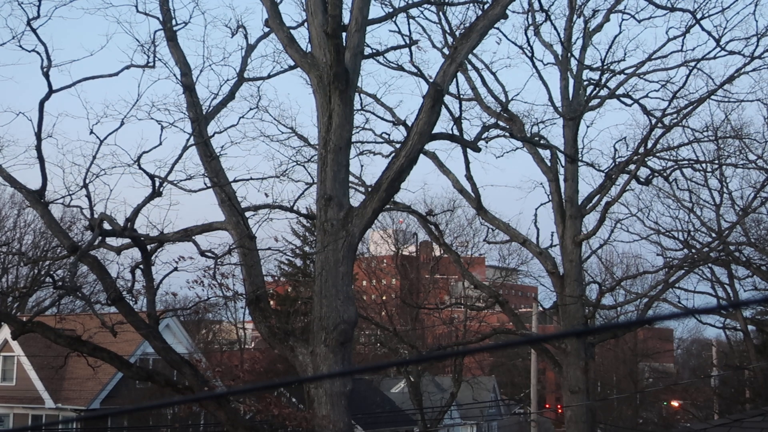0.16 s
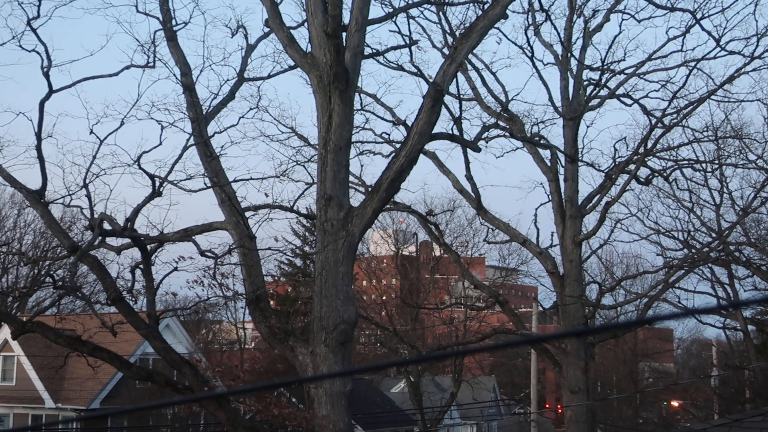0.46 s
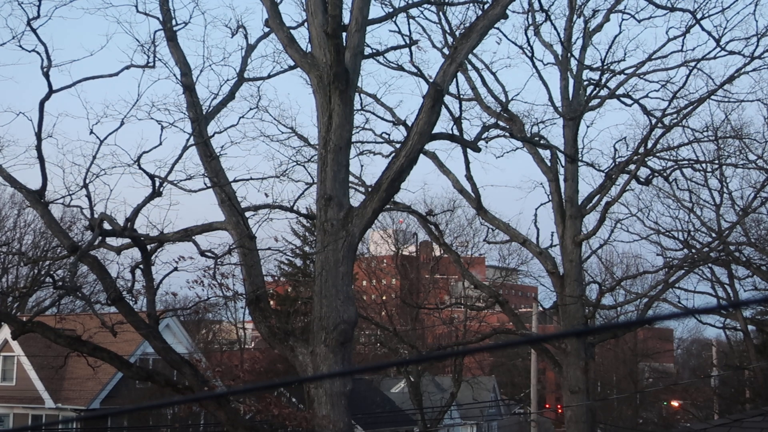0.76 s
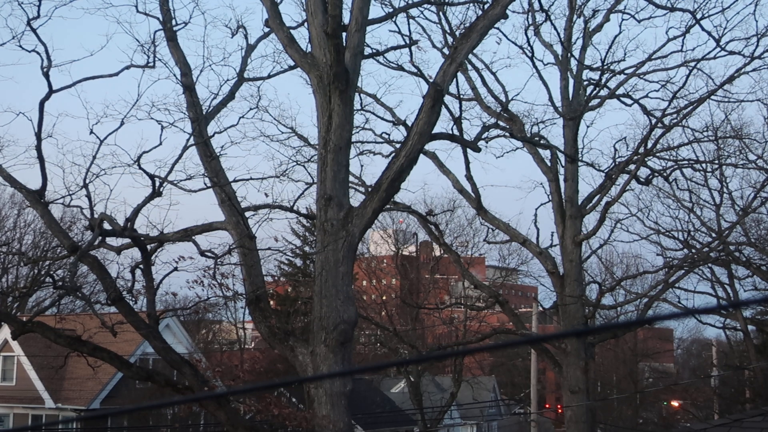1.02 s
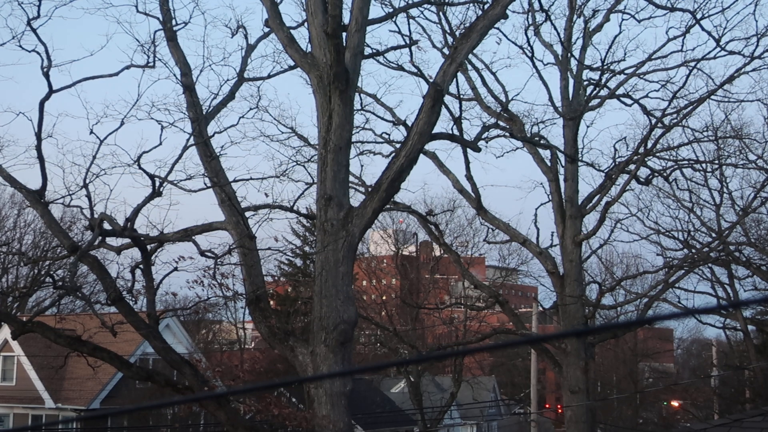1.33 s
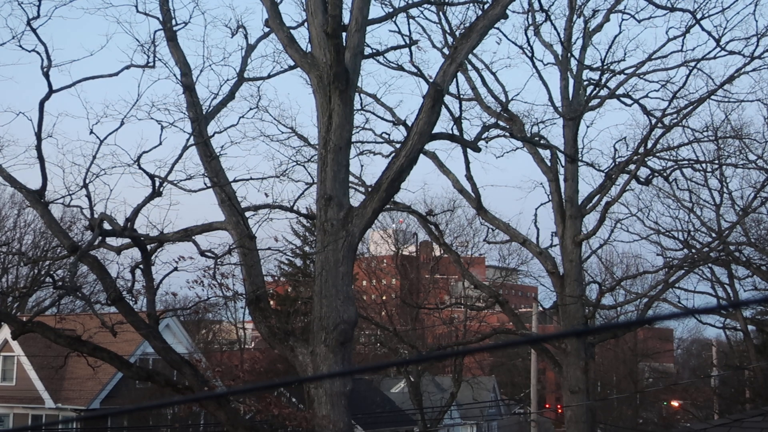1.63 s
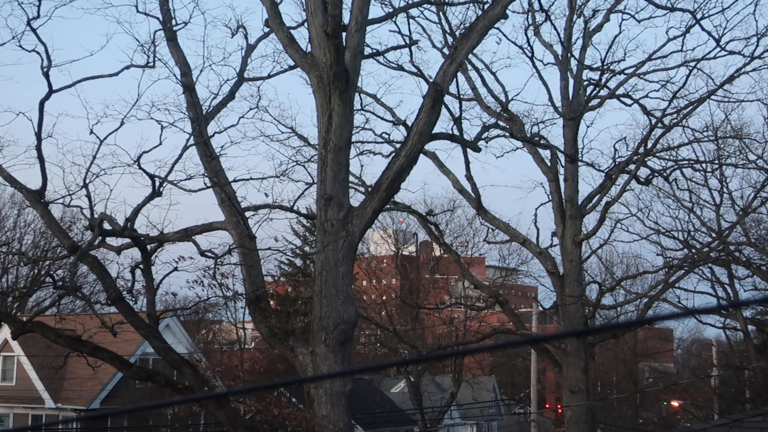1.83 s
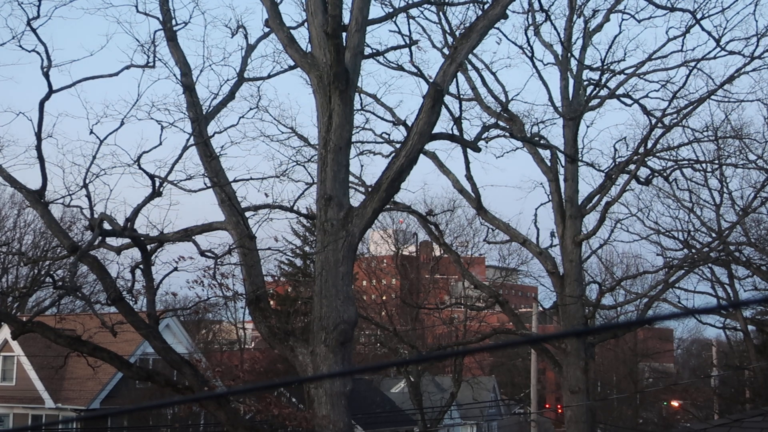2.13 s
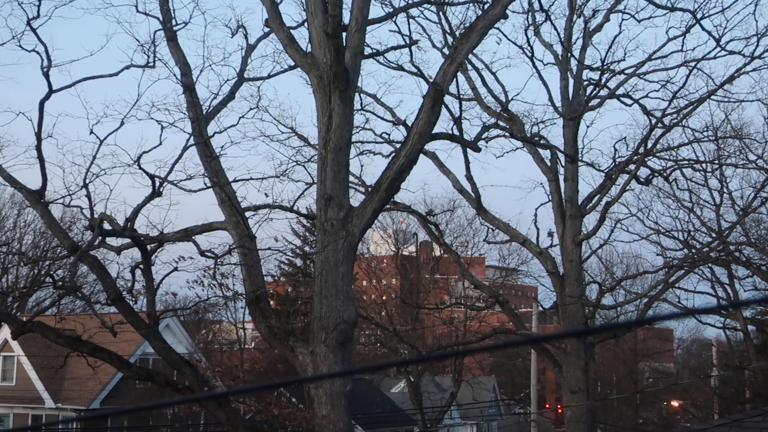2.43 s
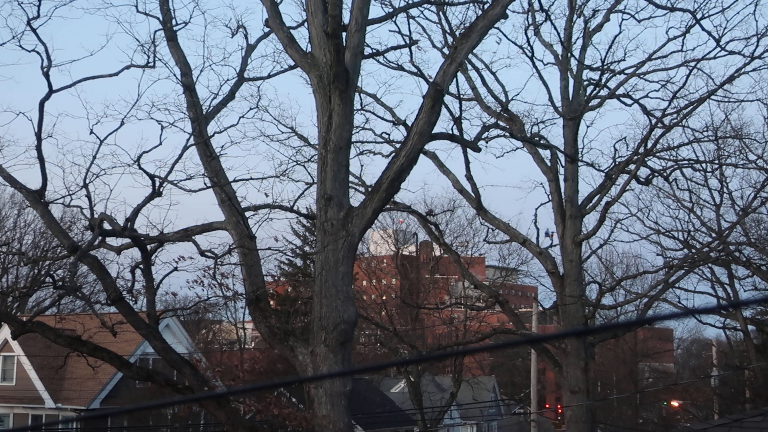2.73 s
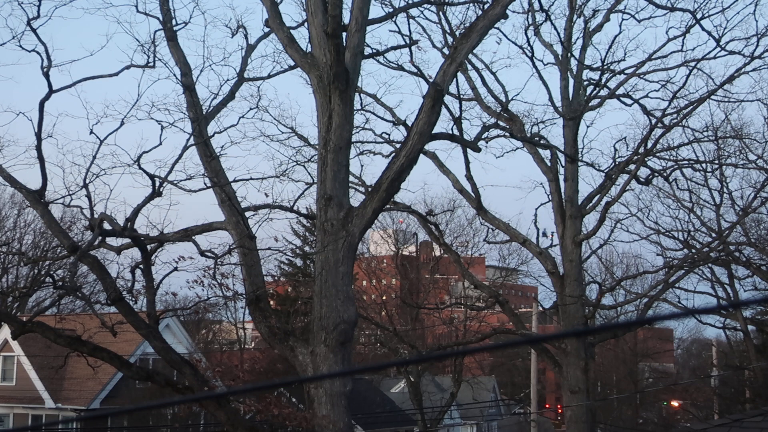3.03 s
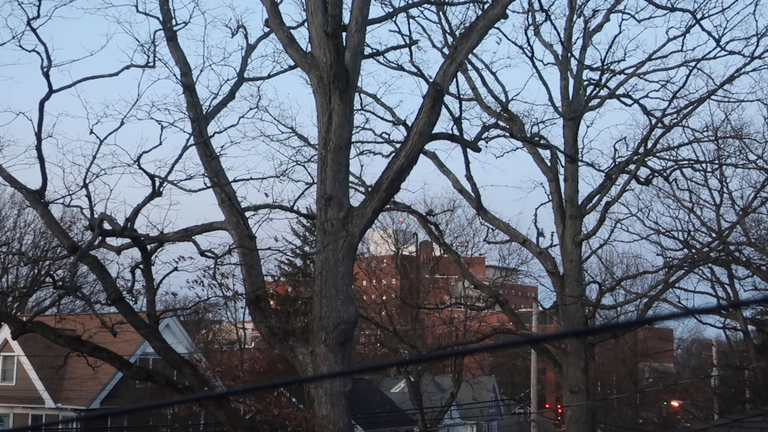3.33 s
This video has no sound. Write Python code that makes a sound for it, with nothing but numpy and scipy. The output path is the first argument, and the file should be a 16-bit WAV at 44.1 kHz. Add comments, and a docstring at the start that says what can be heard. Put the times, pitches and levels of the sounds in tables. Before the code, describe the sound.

Continuous helicopter rotor beat, about twenty-eight thuds a second, starts raspy, turns into sharper uneven slaps, then smears as a low roar rises; heard outdoors from the ground among houses and bare trees.

```python
"""Over houses and bare trees, a four-bladed helicopter flies out of sight.
Each blade pass gives a low thump (harmonics of the blade rate), a hollow slap as it cuts the wake of
the blade ahead (ringing pulse plus scattered noise) and a short rasp (noise burst with ragged bands).
Scattered echoes from the houses return the slaps, over a rush of air (coloured noise) and a faint turbine
whine (wavering sines); near the end the slaps smear and a low roar of noise swells."""
import sys
import numpy as np
from scipy import signal
from scipy.fft import rfft, irfft
from scipy.io import wavfile
from scipy.ndimage import uniform_filter1d, minimum_filter1d

SR = 44100
rng = np.random.default_rng(int(sys.argv[2]) if len(sys.argv) > 2 else 0)


def pcm_store(signal):
    """Save signal as 16-bit PCM."""
    levels = np.round(np.clip(np.atleast_2d(signal), -1, 1) * 32767)
    wavfile.write(sys.argv[1], SR, levels.astype(np.int16).T)


N = 153027

# the four blades in turn: (slap offset [dB], rasp offset [dB])
BLADE_OFFSETS = [(1.5, 1.5), (3.5, 0.6), (1.5, 1.3), (2, 0.76)]


def amp(db):
    """Decibels to gain."""
    return 10 ** (np.asarray(db) / 20)


def evened(x):
    """Scales each row to rms 1."""
    return x / np.sqrt(np.mean(x ** 2, axis=-1, keepdims=True) + 1e-30)


def curve(table, t):
    """Each column of a time table, interpolated at t."""
    s, *columns = np.transpose(table)
    return [np.interp(t, s, c) for c in columns]


def read(points, hz):
    """A spectrum interpolated on a log-frequency axis."""
    f, value = np.transpose(points)
    return np.interp(np.log(hz + 1), np.log(f), value)


def colour(x, points, power=1, size=2048):
    """Filters a sound, without phase shift, by a dB spectrum times power."""
    x = np.pad(x, size, "reflect", reflect_type="odd")
    gain = amp(power * read(points, np.fft.rfftfreq(len(x), 1 / SR)))
    return irfft(rfft(x) * gain, len(x))[size:-size]


def noise(points):
    """Steady noise of rms 1 with the given spectrum."""
    gain = amp(read(points, np.fft.rfftfreq(N, 1 / SR)))
    return evened(irfft(rfft(rng.standard_normal(N)) * gain, N))


def add(mix, s, sound):
    """Mixes a sound in at time s, cropped to the mix."""
    at = round(s * SR)
    sound = sound[max(-at, 0):]
    part = mix[max(at, 0):][:len(sound)]
    part += sound[:len(part)]


def flutter():
    """Quick, irregular gain of churned air: smoothed noise in dB."""
    flutter_rms_db = 2.5
    smooth = uniform_filter1d(uniform_filter1d(rng.standard_normal(N), size=700), size=400)
    return amp(flutter_rms_db * evened(smooth))


def roar(t):
    """Low, fluttering roar of coloured noise that swells near the end."""
    # relative spectrum: (frequency [Hz], density [dB per Hz])
    roar_colour = [(40, -21.5), (90, 3.5), (150, -6), (230, 1), (340, 0), (620, -6.5), (780, -13),
                   (1500, -24), (3000, -33.5), (6000, -73.5)]
    # swell: (time [s], level [dB])
    roar_level = [(2.5, -47.5), (2.9, -41.5), (3.2, -27.5), (3.47, -23.5)]
    return amp(curve(roar_level, t)[0]) * flutter() * noise(roar_colour)


def rush(t):
    """Churned air and exhaust: coloured noise with slowly changing level and treble, plus the roar."""
    # relative spectrum: (frequency [Hz], density [dB per Hz])
    rush_colour = [(20, -28), (45, -4.5), (100, -6.5), (150, 0.5), (230, 5), (290, -3), (380, 0.5),
                   (580, 2.5), (750, -7.5), (1000, -12), (1300, -16), (1700, -22.5), (2150, -29.5),
                   (2850, -34), (3400, -44.5), (4300, -54), (7000, -61.5), (10000, -72), (15000, -89.5)]
    # (time [s], level before the treble change [dB], treble change [dB])
    rush_level = [(0, -22.5, 2), (.4, -24.5, 2), (1.1, -21, 0), (1.5, -26.5, -0.5), (2.0, -24, 0),
                  (2.4, -23, -1), (2.7, -25.5, 0.5), (3.0, -26.5, 6), (3.47, -21.5, -1.5)]
    treble_hz = 925
    level_db, treble_db = curve(rush_level, t)
    air = noise(rush_colour)
    high_pass = signal.butter(2, treble_hz, "high", fs=SR, output="sos")
    treble = signal.sosfiltfilt(high_pass, air)
    return amp(level_db) * (air + (amp(treble_db) - 1) * treble) + roar(t)


def whine(t):
    """Thin turbine tones: sines whose frequency wavers slightly."""
    # (frequency [Hz], level [dB], rms waver [Hz])
    turbine_tones = [(2901, -67, 10), (6592, -80, 2)]
    out = np.zeros(N)
    for hz, db, waver_hz in turbine_tones:
        waver = evened(uniform_filter1d(rng.standard_normal(N), size=1500))
        phase = 2 * np.pi * np.cumsum(hz + waver_hz * waver) / SR
        out += np.sqrt(2) * amp(db) * np.sin(phase)
    return out


def houses(x):
    """Echoes scattered by walls and roofs: sparse random taps that decay exponentially."""
    echo_db, t60_s, first_delay_s = -14.5, 0.55, 0.0069  # echo_db: against the direct sound
    u = np.arange(SR // 2) / SR
    taps = rng.standard_normal(len(u)) * (rng.random(len(u)) < .02)
    taps *= (u > first_delay_s) * amp(-60 * u / t60_s)
    return amp(echo_db) * np.std(x) * evened(signal.fftconvolve(x, taps)[:N])


def rotor_phase(t):
    """Blade passes counted from the lead blade: the integral of the blade rate."""
    # falls a little as the helicopter goes by: (time [s], rate [passes per s])
    blade_rate = [(0, 27.865), (1.5, 27.855), (2.0, 27.78), (3.47, 27.76)]
    lead_blade_s = 1.2418
    passes = np.cumsum(curve(blade_rate, t)[0]) / SR
    return passes - np.interp(lead_blade_s, t, passes)


def thump(t):
    """The loaded blades push out a smooth periodic pressure wave: harmonics of the blade rate."""
    # (multiple of the blade rate [1], relative level [dB])
    harmonics = [(1, -24), (2, -2), (3, -12), (4, -5), (5, -14), (6, -4), (7, -15), (8, -7)]
    # (time [s], gain on all harmonics [dB])
    thump_level = [(0, -25.5), (.35, -23.5), (.9, -23.5), (1.3, -25.5), (1.7, -28.5), (2.2, -29),
                   (2.9, -26.5), (3.47, -24.5)]
    phase = 2 * np.pi * rotor_phase(t)
    wave = sum(amp(db) * np.cos(round(k) * phase) for k, db in harmonics)
    return np.sqrt(2) * wave * amp(curve(thump_level, t)[0])


def bursts(u, rise, fall, spectrum_db, count):
    """One burst of turbulence per pass, which each blade partly repeats on its next turn."""
    memory = 0.92  # correlation of a blade's noise from turn to turn
    blades = len(BLADE_OFFSETS)
    air = rng.standard_normal((count, len(u)))
    for k in range(blades, count):
        air[k] = memory * air[k - blades] + np.sqrt(1 - memory ** 2) * air[k]
    envelope = np.exp(np.minimum(u / rise, -u / fall))  # peak at u = 0
    return evened(irfft(rfft(air * envelope) * amp(spectrum_db)))


def pulse(spectrum_db):
    """Sudden pressure pulses, one per row, ringing with the given spectra (minimum phase)."""
    log_gain = np.log(amp(np.c_[spectrum_db, spectrum_db[:, -2:0:-1]]))
    return evened(np.fft.ifft(np.exp(np.conj(signal.hilbert(log_gain)))).real)


def slap_sounds(u, hz, smear_s, pitch_hz, lag_s):
    """Wake-cutting slaps: a ringing front, then noise of the same colour that grows with smear."""
    # relative spectrum at the centre pitch: (frequency [Hz], density [dB per Hz])
    slap_colour = [(60, -48.5), (130, -23.5), (230, -5), (290, -8.5), (350, 6), (420, 3.5), (490, 1),
                   (570, -0.5), (650, -13.5), (760, -18.5), (1000, -30.5), (1500, -35.5), (2200, -55),
                   (4000, -89)]
    centre_hz = 428.2
    rise_over_fall, equal_smear_s = 0.83, 0.0034  # at equal_smear_s front and scatter are equal
    smear_s = smear_s[:, None]
    body_db = read(slap_colour, hz * centre_hz / pitch_hz[:, None])
    front = np.roll(pulse(body_db), len(u) // 2 - round(lag_s * SR), axis=1)
    scatter = bursts(u, rise_over_fall * smear_s, smear_s, body_db, count=len(pitch_hz))
    return evened(front + smear_s / equal_smear_s * scatter)


def ragged(rasps, hz, count=6):
    """The wake meets the blade piece by piece: each band has its own strength and arrival."""
    ragged_db, ragged_s = 1.8, .0009
    centres_hz = np.geomspace(400, 3200, count)
    bands = np.array([read(np.c_[centres_hz, one], hz) for one in np.eye(count)])
    level, late = np.moveaxis(rng.standard_normal((len(rasps), 2, count)) @ bands, 1, 0)
    phase = -2 * np.pi * hz[1] * np.cumsum(ragged_s * late, axis=1)  # integrates group delay
    return evened(irfft(rfft(rasps) * amp(ragged_db * level) * np.exp(1j * phase)))


def rasp_sounds(u, hz, bright_db):
    """Short rasps: coloured noise bursts, tilted in treble and bass, then made ragged."""
    # relative spectrum before tilt: (frequency [Hz], density [dB per Hz])
    rasp_colour = [(90, -16.5), (170, -4.5), (240, 11), (300, -11), (560, 0.5), (830, 7.5), (1000, 3),
                   (1200, -5.5), (1480, -7.5), (1780, -9), (2050, -20.5), (2900, -21.5), (3400, -38),
                   (4200, -53.5), (8000, -87)]
    rise_s, fall_s, pivot_hz = 0.0019, 0.0062, 1070
    tilt_db = bright_db[:, None] * np.clip(2 * np.log2((hz + 1) / pivot_hz), -1, 1)
    rasps = bursts(u, rise_s, fall_s, read(rasp_colour, hz) + tilt_db, count=len(bright_db))
    return ragged(rasps, hz)


def blade_slaps(t, size=4096):
    """Every pass slaps and rasps; blades differ, some passes stand out, and a wall repeats each slap."""
    # (time [s], slap level [dB], rasp level [dB], slap smear [s],
    #  rasp treble lift and bass cut [dB], slap pitch [Hz])
    flight = [(0, -36.5, -32, 0.0053, -1, 405), (.25, -29, -27, 0.0081, -2, 418.4),
              (.6, -29, -25, 0.0057, -4, 418), (.9, -25, -27.5, 0.0052, -1, 413.5),
              (1.2, -25, -29, 0.0026, 1.5, 452), (1.4, -31, -32.5, 0.003, 4, 431),
              (1.7, -24, -30, 0.0026, 2.5, 431.6), (1.9, -23.5, -37, 0.0037, 8, 446),
              (2.1, -24, -36.5, 0.0037, 2, 442), (2.35, -23, -35.5, 0.0044, -2, 449),
              (2.6, -28.5, -38.5, 0.0035, -1, 443), (2.85, -24, -32, 0.0082, -1, 414.5),
              (3.0, -22, -35.5, 0.0081, 0, 364), (3.25, -21, -38.5, 0.0068, -1.5, 414),
              (3.47, -24, -42, 0.016, 3.5, 429.5)]
    # passes that stand out: (time [s], extra slap [dB], extra rasp [dB], slap pitch shift [semitones])
    hard_slaps = [(.13, 1.5, 4, 0.5), (.17, 8.5, 0, 0), (.27, -1, 3.5, -0.5), (.31, 5.5, 0.5, 1),
                  (.42, 2.5, 3.5, 3), (.56, 6, 6.5, 1), (.60, 3, -2.5, 1), (.81, 7.5, 1, 0.5),
                  (.85, 6, 2.5, 1.5), (.95, 2.5, 1.5, -1.5), (.99, 2, 0, 1), (1.10, 3, 1, -0.5),
                  (1.13, -1, 2, -1), (1.21, 4, 3, 1), (1.24, 7.5, 0.5, -0.5), (1.28, 6, 3, 0),
                  (1.39, 13, 2, -1.5), (1.42, 6, -2, 0), (1.53, 7.5, -2.5, 0.5), (1.60, 0.5, 0, -4.5),
                  (1.71, 0.5, 3.5, -0.5), (1.82, 6, 0.5, 0), (1.85, 1, -1, 2.5), (1.96, 6, 3.5, -1),
                  (2.10, 3, 4, -0.5), (2.25, 3, 3, 1), (2.28, 2, 3.5, 1.5), (2.39, 5.5, -8.5, -1.5),
                  (2.43, 5, -4.5, -2), (2.54, 9.5, 3.5, -2.5), (2.68, 4.5, -0.5, 1.5),
                  (2.82, -1.5, 1.5, 2.5), (2.97, 2, 4, 0), (3.01, 1, 1.5, 0), (3.11, 1, 1, -.5),
                  (3.18, 3, -1.5, 1.5), (3.26, 0, -1.5, 2), (3.29, 3.5, -0.5, -0.5)]
    # (time [s], rasp lag behind the pass [s], nearest-wall echo delay [s])
    paths = [(0, .003, .0095), (.6, .001, .0095), (1.2, .0003, .0135), (1.9, .0003, .0139),
             (2.3, .004, .0139), (3.47, .004, .0139)]
    slap_spread_db, rasp_spread_db = 0.4, .7
    wall_db, slap_lag_s = -13, 0.00194  # wall: against the slap; lag: body behind its front

    phase = rotor_phase(t)
    passes = np.arange(np.ceil(phase[0]), phase[-1]).astype(int)
    when = np.interp(passes, phase, t)
    slap_db, rasp_db, smear_s, bright_db, pitch_hz = curve(flight, when)
    db = np.c_[slap_db, rasp_db] + np.array(BLADE_OFFSETS)[passes % len(BLADE_OFFSETS)]
    db += rng.standard_normal(db.shape) * [slap_spread_db, rasp_spread_db]
    for s, *extra_db, semitones in hard_slaps:
        k = np.argmin(abs(when - s))
        db[k] += extra_db
        pitch_hz[k] *= 2 ** (semitones / 12)

    u = (np.arange(size) - size // 2) / SR
    hz = np.fft.rfftfreq(size, 1 / SR)
    taper = signal.windows.tukey(size, .5)
    slaps = taper * slap_sounds(u, hz, smear_s, pitch_hz, slap_lag_s)
    rasps = taper * rasp_sounds(u, hz, bright_db)

    out = np.zeros(N)
    for s, (slap_gain, rasp_gain), slap, rasp in zip(when, amp(db), slaps, rasps):
        rasp_lag_s, wall_delay_s = curve(paths, s)
        start = s + u[0]
        add(out, start + rasp_lag_s, rasp_gain * rasp)
        add(out, start + slap_lag_s, slap_gain * slap)
        add(out, start + slap_lag_s + wall_delay_s, amp(wall_db) * slap_gain * slap)
    return out * np.sqrt(N / len(when) / size)  # levels refer to the rms of the whole train


def scene():
    """The helicopter, centred in the bass and more diffuse in the treble."""
    # (frequency [Hz], gain of the diffuse side [dB])
    width = [(60, -47), (200, -32.5), (490, -28), (1100, -12), (2000, -11), (3000, -12), (4500, 3.5),
             (9000, 8)]
    # (frequency [Hz], left minus right [dB])
    balance = [(60, 0), (380, 0), (520, 1.3), (740, 1.6), (1130, 4), (1710, -.5), (2600, -1), (5000, .3)]
    t = np.arange(N) / SR
    slaps = blade_slaps(t)
    mid = rush(t) + whine(t) + houses(slaps) + thump(t) + slaps
    glancing = signal.hilbert(blade_slaps(t)).imag  # slaps from the side, 90 degrees out of phase
    side = colour(glancing + houses(slaps) + rush(t), width)
    left = colour(mid + side, balance, .5)
    right = colour(mid - side, balance, -.5)
    return np.array([left, right])


def record(dry):
    """A smooth limiter holds down the hardest slaps; then soft ends and the band limit."""
    ceiling, edge_hz = .83, 15200
    gain = minimum_filter1d(ceiling / np.maximum(abs(dry).max(0), ceiling), size=801)
    gain = uniform_filter1d(uniform_filter1d(gain, size=400), size=400)
    gain = gain * signal.windows.tukey(N, .002)
    low_pass = signal.firwin(511, edge_hz, window=("kaiser", 9), fs=SR)
    return signal.oaconvolve(dry * gain, low_pass[None], "same")


dry = scene()
out = record(dry)
pcm_store(out)
```